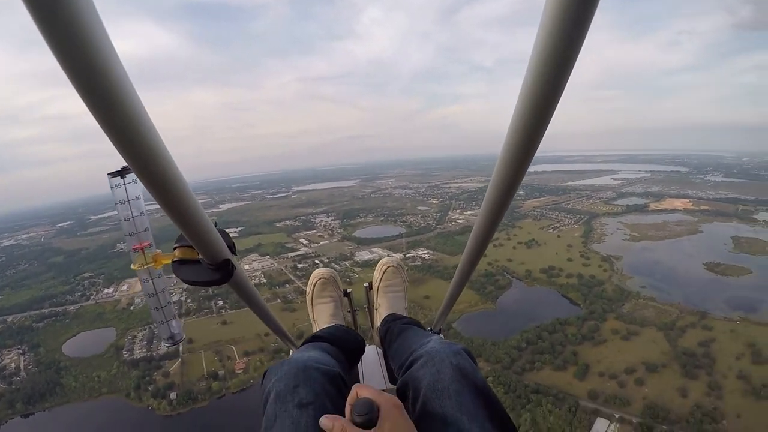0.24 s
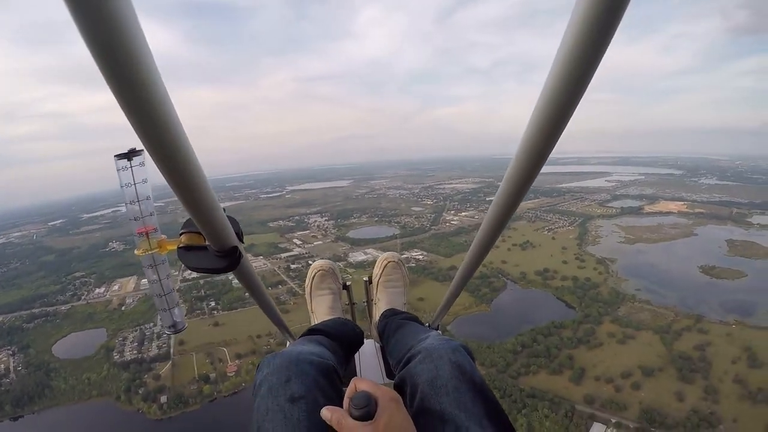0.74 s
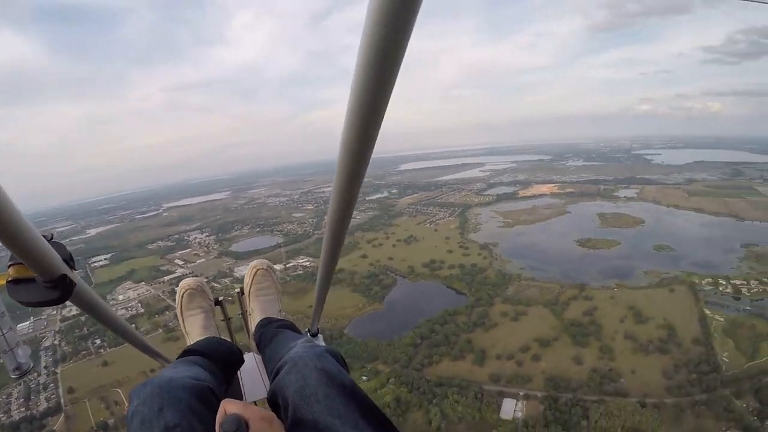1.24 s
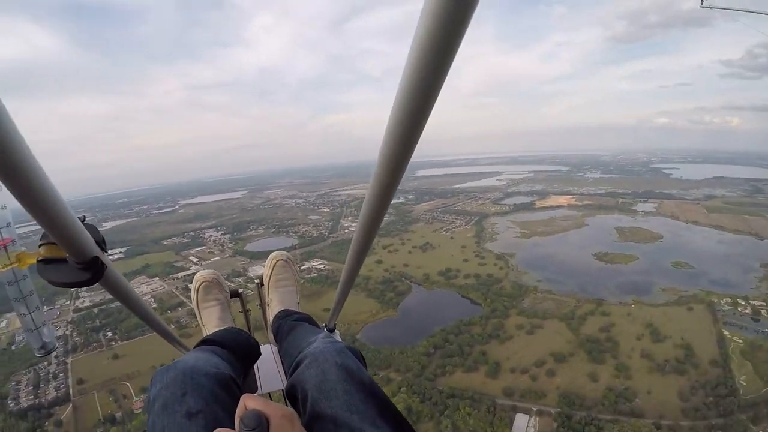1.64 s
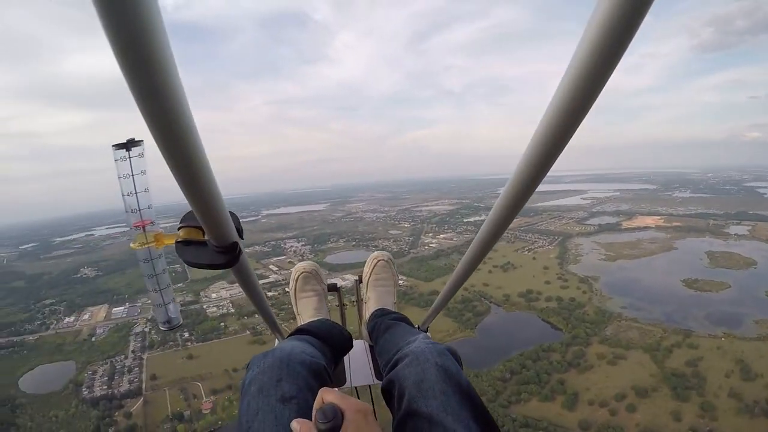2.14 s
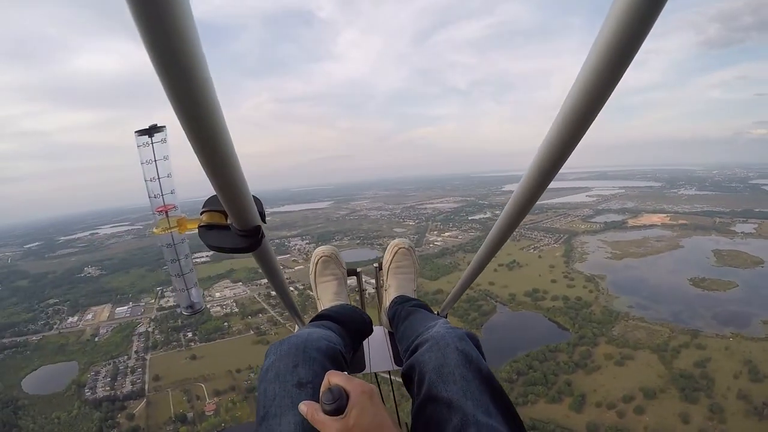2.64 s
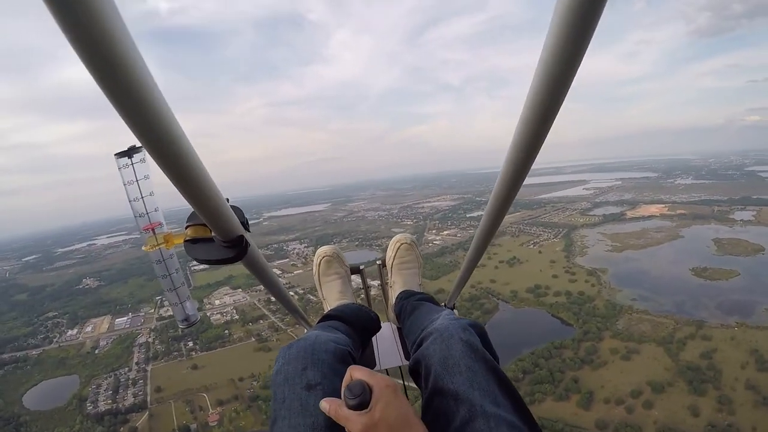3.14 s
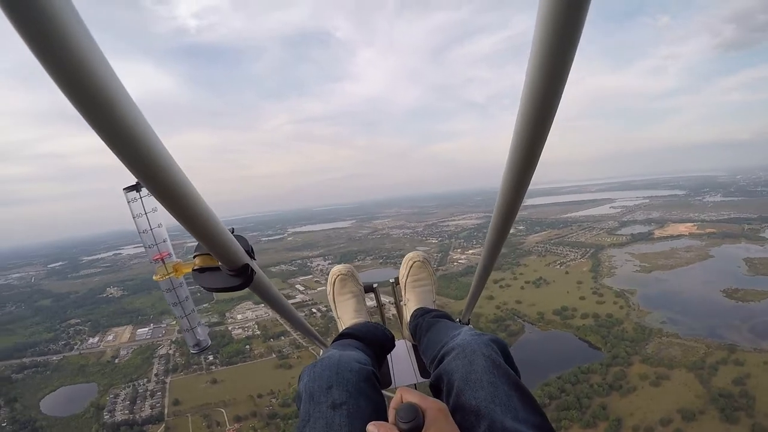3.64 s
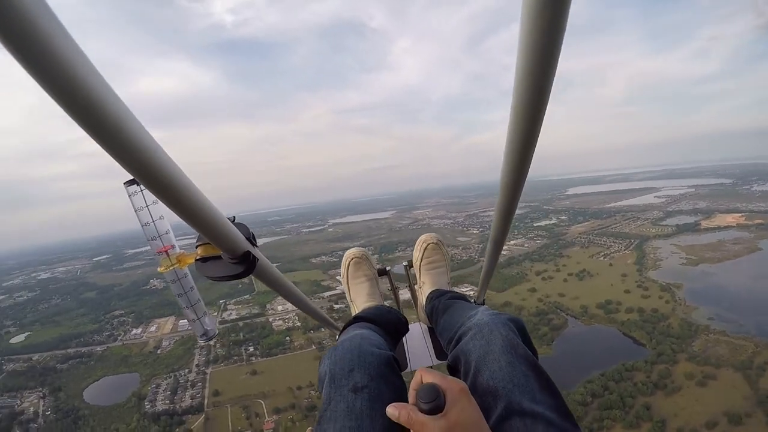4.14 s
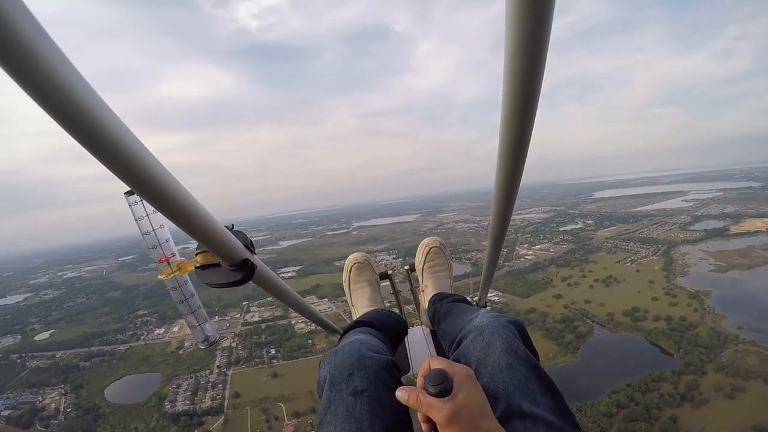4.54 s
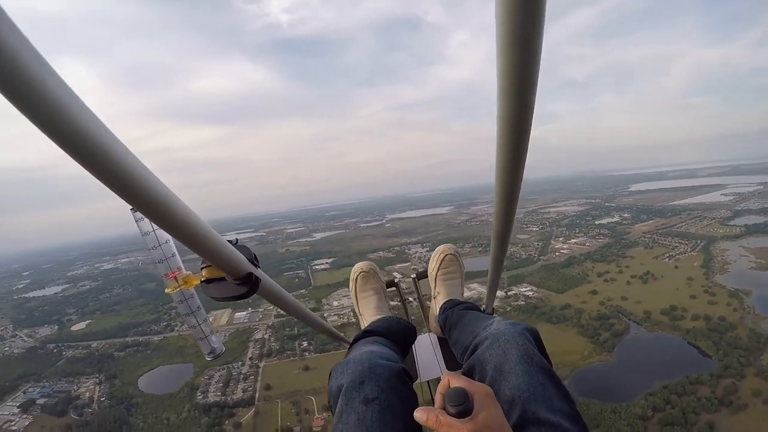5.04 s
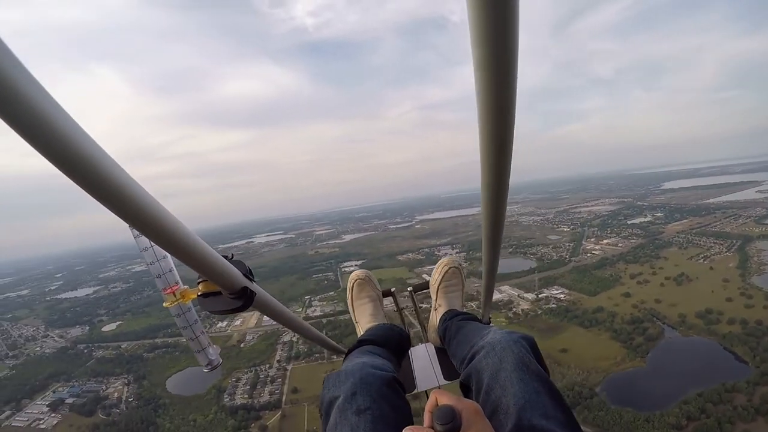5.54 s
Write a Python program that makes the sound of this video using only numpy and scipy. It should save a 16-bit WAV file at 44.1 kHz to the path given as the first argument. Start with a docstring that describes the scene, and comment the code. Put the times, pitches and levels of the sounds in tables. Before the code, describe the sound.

Open-seat flight with a humming engine, rushing, whistling air, and a long thumping wind gust that briefly pushes the engine drone back.

```python
"""The open front seat of an ultralight in flight. A geared four-stroke engine and the three-blade propeller
behind the seat sound as harmonics of one shaft, which gains a little speed in the first second and then runs
steadily. The slipstream is shaped noise: it roars, rushes and hisses, and rings the hollows of the camera housing.
In mid-flight a long gust of random eddies and single slaps buffets the microphone; the camera's gain control
turns everything down, and the engine comes back slowly as the gust dies."""
import sys
import numpy as np
from scipy import signal
from scipy.fft import rfft, irfft
from scipy.io import wavfile
from scipy.ndimage import uniform_filter1d, minimum_filter1d

SR = 44100
rng = np.random.default_rng(int(sys.argv[2]) if len(sys.argv) > 2 else 0)


def file_out(sig):
    """Save sig as 16-bit WAV at sys.argv[1]."""
    # one column per channel
    cols = np.atleast_2d(sig).T
    # limit, then scale
    lim = np.clip(cols, -1, 1)
    pcm = np.round(lim * 32767).astype(np.int16)
    wavfile.write(sys.argv[1], SR, pcm)


N = 254898
TIME = np.arange(N) / SR  # s


def undb(db):
    """Logarithmic level: decibels to amplitude gain."""
    return 10 ** (np.asarray(db) / 20)


def unit(x):
    """Normalization: scale to rms 1."""
    return x / np.sqrt(np.mean(x ** 2))


def curves(table):
    """Linear interpolation: each column after the time as one value per sample."""
    seconds, *columns = np.transpose(table)
    return [np.interp(TIME, seconds, column) for column in columns]


def white():
    """White noise: equal mean power at all frequencies."""
    return rng.standard_normal(N)


def walk(rate_hz):
    """Low-passed noise: a smooth random wandering of rms 1, up to about rate_hz swings a second."""
    hop = 32  # samples between coarse ticks
    ticks = TIME[::hop]
    f = np.fft.rfftfreq(len(ticks), hop / SR)
    spectrum = rfft(rng.standard_normal(len(ticks))) / (1 + (f / rate_hz) ** 4)
    slow = irfft(spectrum, len(ticks))
    return unit(np.interp(TIME, ticks, slow))


def colour(x, points):
    """Spectral shaping: filter x through (Hz, dB) points, falling away beyond their ends, to rms 1."""
    f = np.maximum(np.fft.rfftfreq(N, 1 / SR), 1)
    hz, db = np.transpose(points)
    ends = np.minimum(1, np.minimum(f / hz[0], hz[-1] / f)) ** 2
    shape = undb(np.interp(np.log(f), np.log(hz), db))
    return unit(irfft(rfft(x) * ends * shape, N))


def cavity(modes):
    """Cavity resonance: squared resonant responses, each blown by its own noise, summed to rms 1."""
    f = np.maximum(np.fft.rfftfreq(N, 1 / SR), 1)
    spectrum = 0
    for hz, width, db in modes:
        detuning = (f * f - hz * hz) / (f * width)
        spectrum = spectrum + rfft(white()) * undb(db) / (1 + 1j * detuning) ** 2
    return unit(irfft(spectrum, N))


def orders(turns, table, flutter_db, flutter_hz, smear_rad):
    """Harmonic series of a rotating shaft: turbulent air on the way shakes each order's level and phase."""
    out = 0
    for multiple, db in table:
        phase = 2 * np.pi * (multiple * turns + rng.random()) + smear_rad * walk(flutter_hz)
        amplitude = np.sqrt(2) * undb(db + flutter_db * walk(flutter_hz))
        out = out + amplitude * np.sin(phase)
    return out


# exhaust note, strongest at twice the firing rate: (multiple of shaft speed, level [dB])
EXHAUST_ORDERS = [(2, -8), (8, 0), (14, -31.5), (16, -35), (28, -25)]
EXHAUST_DB = -22.5


def exhaust(turns):
    """Periodic gas pulses: the firings discharge at fixed multiples of the shaft speed."""
    return undb(EXHAUST_DB) * orders(turns, EXHAUST_ORDERS, flutter_db=.6, flutter_hz=12, smear_rad=.05)


# three blades and four firings a turn: (multiple of shaft speed, level [dB])
THRUM_ORDERS = [(3, 0.5), (4, -2), (21, -29.5)]
THRUM_DB = -23  # before the gust acts
THRUM_GUST_SHARE = -0.14  # dB per dB of small eddies


def thrum(turns, small_db):
    """Blade-passing and firing tones: both beat at whole multiples of one shaft; the gust weakens them."""
    tones = orders(turns, THRUM_ORDERS, flutter_db=1.4, flutter_hz=9, smear_rad=.2)
    return undb(THRUM_DB + THRUM_GUST_SHARE * small_db) * tones


# engine growl: (multiple of shaft speed, level [dB])
GROWL_ORDERS = [(9, -4), (10, 1), (15, -11)]
GROWL_DB = -42.5  # at cruising speed, before the wash lifts it
GROWL_DB_PER_HZ = 3.5  # for each turn per second that the shaft lacks of cruising speed
GROWL_WASH_SHARE = 0.21  # dB per dB of wash


def growl(turns, shaft_hz, wash_db):
    """Load-dependent engine orders: strongest while the engine pulls up to speed."""
    cruising_hz = np.median(shaft_hz)
    lack_hz = np.maximum(cruising_hz - shaft_hz, 0)
    growl_db = GROWL_DB + GROWL_DB_PER_HZ * lack_hz + GROWL_WASH_SHARE * wash_db
    return undb(growl_db) * orders(turns, GROWL_ORDERS, flutter_db=.8, flutter_hz=8, smear_rad=.1)


# the sharp edge of each blade pulse: (multiple of shaft speed, level [dB])
BUZZ_ORDERS = [(6, 10.5), (12, 1), (18, -8.5), (24, -10), (27, -11), (30, -7), (36, -1.5), (42, -9.5)]
BUZZ_DB = -46.5  # before the wash lifts it


def tip_buzz(turns, wash_db):
    """Higher harmonics of blade passing: a sharp-edged pulse spreads its energy up the series."""
    return undb(BUZZ_DB + wash_db) * orders(turns, BUZZ_ORDERS, flutter_db=1.5, flutter_hz=12, smear_rad=.17)


# propeller shaft, one turn per engine cycle: (time [s], speed [turns per second])
SHAFT_SPEED = [(0, 47.9), (.14, 48.85), (.5, 49.5), (.8, 50.05), (1.1, 50.05), (1.4, 50.55), (1.7, 50.35),
               (2.05, 50.7), (3.5, 50.75), (4.6, 50.7), (5.2, 50.5), (5.78, 50.65)]


def powerplant(small_db, wash_db):
    """Phase locking by the gearbox: engine and propeller share one shaft angle, with slight random unevenness."""
    shaft_hz, = curves(SHAFT_SPEED)
    turns = np.cumsum(shaft_hz * (1 + .0003 * walk(6))) / SR
    engine = exhaust(turns) + growl(turns, shaft_hz, wash_db)
    return engine + thrum(turns, small_db) + tip_buzz(turns, wash_db)


def eddies(points, per_s, evenness, span_s):
    """Shot noise: vortices arrive at random as pushes or pulls; neighbours in time are about equally strong."""
    arrivals = rng.random(N) < per_s / SR
    x = colour(arrivals * white(), points)
    power = np.abs(uniform_filter1d(x * x, max(int(span_s * SR), 2)))
    return unit(x / (power + 1e-3) ** (evenness / 2))


# spectra before the eddies are evened out in time: (frequency [Hz], relative level [dB per Hz])
LARGE_EDDY_SPECTRUM = [(8, -23), (18, -8), (34, 0.5), (48, 0), (70, -4), (130, -32.5), (400, -47)]
SMALL_EDDY_SPECTRUM = [(25, -12), (50, -13), (72, 1), (98, -1.5), (130, -5.5), (170, -7), (260, -14.5),
                       (400, -20.5), (600, -28.5), (1200, -41)]
LARGE_EDDY_DB, SMALL_EDDY_DB = -15.5, -19.5  # in calm flight


def buffeting(large_db, small_db):
    """Turbulent pressure on a microphone: large eddies rumble and small ones flap, in irregular lumps."""
    large = eddies(LARGE_EDDY_SPECTRUM, per_s=400, evenness=.85, span_s=.1)
    small = eddies(SMALL_EDDY_SPECTRUM, per_s=550, evenness=.95, span_s=.1)
    rumble = undb(LARGE_EDDY_DB + large_db + 0.91 * walk(5.2)) * large
    flap = undb(SMALL_EDDY_DB + small_db + 1.8 * walk(12.3)) * small
    return rumble + flap


# roar round the seat: (frequency [Hz], relative level [dB per Hz])
ROAR_SPECTRUM = [(60, 7), (150, 4.5), (290, 6.5), (380, 0.5), (480, 0), (600, -8.5), (800, -11.5),
                 (1100, -20), (1600, -27), (3500, -32)]
ROAR_DB = -26.5  # before wash, gust and breakup
ROAR_WASH_SHARE, ROAR_GUST_SHARE = 0.87, 0.3  # dB per dB of wash, of small eddies
WAKE_ROAR = 26  # added power per unit of slap power


def roar(pressure, wake, small_db, wash_db, turbulence):
    """Eddy cascade: strong eddies break up into finer ones, so the roar rasps with each swing of pressure."""
    roar_db = ROAR_DB + ROAR_WASH_SHARE * wash_db + ROAR_GUST_SHARE * small_db
    breakup = np.sqrt(0.98 + (3 * pressure ** 2 + WAKE_ROAR * wake) / undb(small_db) ** 2)
    return undb(roar_db + 1.12 * turbulence) * breakup * colour(white(), ROAR_SPECTRUM)


# rush over the tubes: (frequency [Hz], relative level [dB per Hz])
RUSH_SPECTRUM = [(600, -9.5), (1150, -10), (1500, -3.5), (1780, 0.5), (2050, -4), (2300, -4), (2600, -1.5),
                 (2850, -4), (3090, -0.3), (3350, -8.5), (3900, -5), (4200, -25), (5500, -24), (9000, -38)]
RUSH_DB = -28  # before wash and edge
RUSH_WASH_SHARE, EDGE_RUSH_SHARE = 0.16, 0.16  # dB per dB of wash, of edge


def rush(wash_db, edge_db, turbulence):
    """Broadband flow noise: air streams over the tubes of the frame."""
    rush_db = RUSH_DB + RUSH_WASH_SHARE * wash_db + EDGE_RUSH_SHARE * edge_db
    return undb(rush_db + 0.38 * turbulence) * colour(white(), RUSH_SPECTRUM)


# air grazing the housing: (frequency [Hz], relative level [dB per Hz])
HISS_SPECTRUM = [(3500, -16.5), (5200, 6.5), (6200, -6.5), (7100, 4), (7650, -2.5), (8300, 4.5), (9300, -6),
                 (9900, -4), (10500, 3), (11550, -7.5), (12400, -4.5), (13700, -16), (15200, -22)]
HISS_DB = -48.5  # before grazing and edge
EDGE_HISS_SHARE = 0.47  # dB per dB of edge


def hiss(graze_db, edge_db, turbulence):
    """Boundary-layer noise: fine turbulence grazes the housing."""
    hiss_db = HISS_DB + graze_db + EDGE_HISS_SHARE * edge_db
    return undb(hiss_db + 0.48 * turbulence) * colour(white(), HISS_SPECTRUM)


# hollow of the housing: (frequency [Hz], width [Hz], level [dB])
HOLLOW_MODES = [(1450, 220, 0)]
HOLLOW_DB = -33  # before grazing


def hollow_tone(graze_db):
    """Flow-excited cavity resonance: grazing air rings a hollow, whose tone follows the hiss."""
    return undb(HOLLOW_DB + graze_db + 1.3 * walk(8)) * cavity(HOLLOW_MODES)


# whistling hollows: (frequency [Hz], width [Hz], level [dB])
WHISTLE_MODES = [(3605, 200, -1.5), (3762, 324, 0.5), (4612, 190, -13), (5360, 160, -20.5),
                 (5720, 210, -21.5), (6400, 500, -25)]
WHISTLE_DB = -34  # before blowing and edge


def whistle(blown_db, edge_db, turbulence):
    """Edge-blown resonance: noise through narrow modes, louder when the air meets an edge squarely."""
    whistle_db = WHISTLE_DB + blown_db + edge_db
    return undb(whistle_db + 0.7 * turbulence + 0.82 * walk(2.7)) * cavity(WHISTLE_MODES)


# air on the housing: (time [s], level of hiss and hollow tone [dB], level of whistle [dB])
GRAZING = [(0, -2.2, 2.5), (.5, -2.5, -2), (1, 0, -1), (1.9, -0.5, 0), (2.1, 3.5, 7), (3, 1, 4.5),
           (4, -0.5, 5), (5, -4.5, 1.5), (5.78, -2.5, -3)]
# at first the air meets an edge of the housing squarely, until the camera swings away
EDGE_DB, EDGE_END_S, EDGE_FADE_S = 6.5, 1.105, .04


def slipstream(pressure, wake, small_db, wash_db):
    """Common modulation: one turbulence shakes all but the hollow tone together."""
    graze_db, blown_db = curves(GRAZING)
    edge_db = EDGE_DB * np.clip((EDGE_END_S - TIME) / EDGE_FADE_S, 0, 1)
    turbulence = walk(31)
    stream = roar(pressure, wake, small_db, wash_db, turbulence) + rush(wash_db, edge_db, turbulence)
    housing = hiss(graze_db, edge_db, turbulence) + hollow_tone(graze_db)
    return stream + housing + whistle(blown_db, edge_db, turbulence)


# single vortices that slap the microphone: (time [s], centre to peak [s], peak pressure [dB])
VORTEX_SLAPS = [(1.7915, .0018, 2.5), (1.8325, .0011, 2), (2.0235, .003, 2.5), (2.051, .0018, 3),
                (2.182, .002, 1), (3.355, .002, 5.5), (3.428, .003, 5)]


def slaps():
    """Pressure dipole of a passing vortex: a push, then a pull."""
    out = np.zeros(N)
    for seconds, half_s, db in VORTEX_SLAPS:
        u = (TIME - seconds) / half_s
        out -= undb(db) * u * np.exp((1 - u * u) / 2)
    return out


# wind on the microphone, over calm flight: (time [s], large eddies [dB], small eddies [dB])
GUST_STRENGTH = [(0, 0, -4.5), (.9, 2, 2), (1.25, -4, 0), (1.9, -2, 2), (2.3, 7, 11.5), (2.7, 10.5, 12.5),
                 (3.45, 7, 9.5), (3.7, 6, 5), (4, 2, 4.5), (4.3, 4.5, 5), (4.6, 1.5, -0.5), (5.2, 0.5, -1),
                 (5.78, -4, 1)]
# how strongly the noise of propeller and engine reaches the seat: (time [s], level [dB])
WASH_STRENGTH = [(0, 9.5), (.3, 3), (1.2, 0), (3.2, 8.5), (3.9, 2.5), (4.8, 6.5), (5.5, 8), (5.78, 9)]
WAKE_S = 0.016  # span over which the roar flares around each slap


def scene():
    """Superposition: engine, slipstream and wind pressure add at one microphone."""
    wash_db, = curves(WASH_STRENGTH)
    large_db, small_db = curves(GUST_STRENGTH)
    slap = slaps()
    pressure = buffeting(large_db, small_db) + slap
    wake = np.abs(uniform_filter1d(slap ** 2, int(WAKE_S * SR)))
    mix = powerplant(small_db, wash_db) + slipstream(pressure, wake, small_db, wash_db) + pressure
    return mix[None]


CEILING_DB, RECOVER_DB_PER_S = -12, 5.5  # rms ceiling, speed of recovery
DETECT_S, GLIDE_S = 0.16, 0.31  # averaging time of the level, time of the glide to a new gain


def gain_control(x):
    """Level compression: turn down by the excess over the ceiling, then come back at a steady rate."""
    step = 1 / (DETECT_S * SR)
    power = signal.lfilter([step], [1, step - 1], x[0] ** 2)
    excess_db = np.maximum(10 * np.log10(power + 1e-12) - CEILING_DB, 0)
    recovery_db = RECOVER_DB_PER_S * TIME
    # a running maximum in this tilted frame is a peak that decays steadily
    duck_db = np.maximum.accumulate(excess_db + recovery_db) - recovery_db
    return x * undb(-uniform_filter1d(duck_db, int(GLIDE_S * SR)))


TOP_HZ = 15200


def record(dry):
    """Dynamic range and band limiting: the camera rides its gain, a limiter ducks peaks, the top is cut."""
    ridden = gain_control(dry)
    size = int(.006 * SR)  # limiter window
    headroom = np.minimum(1, .93 / (np.abs(ridden) + 1e-9))
    gain = uniform_filter1d(minimum_filter1d(headroom, size), size)
    soft_ends = signal.windows.tukey(N, size / N)
    top_cut = signal.ellip(10, .1, 80, TOP_HZ, fs=SR, output="sos")
    return signal.sosfilt(top_cut, ridden * gain * soft_ends)


dry = scene()
out = record(dry)
file_out(out)
```